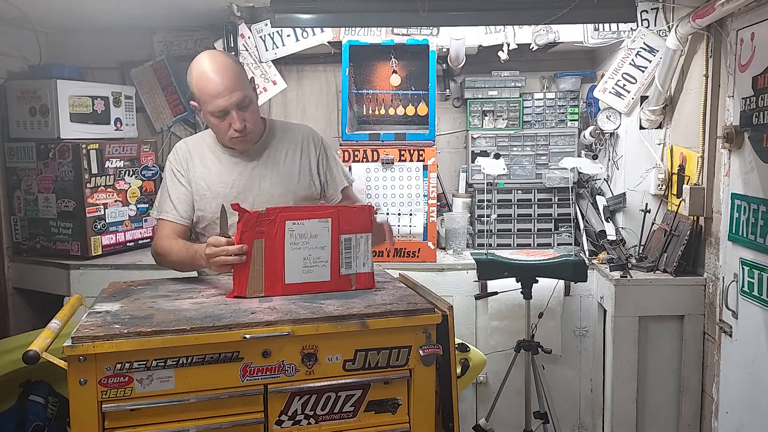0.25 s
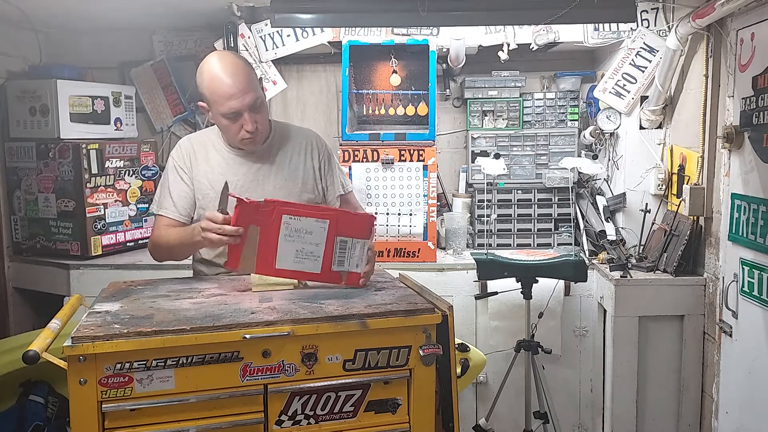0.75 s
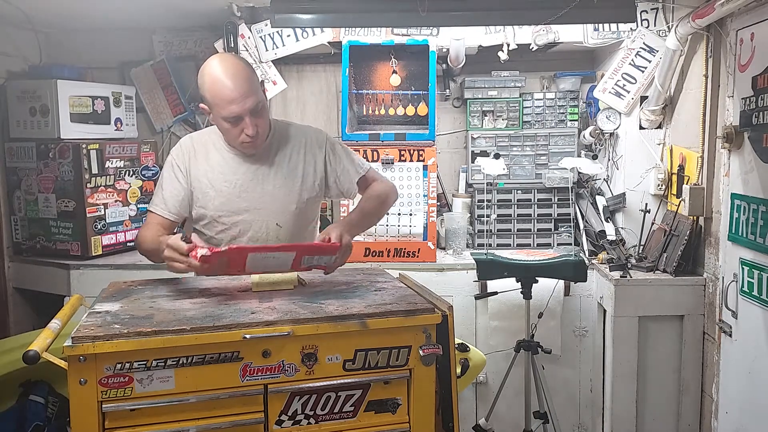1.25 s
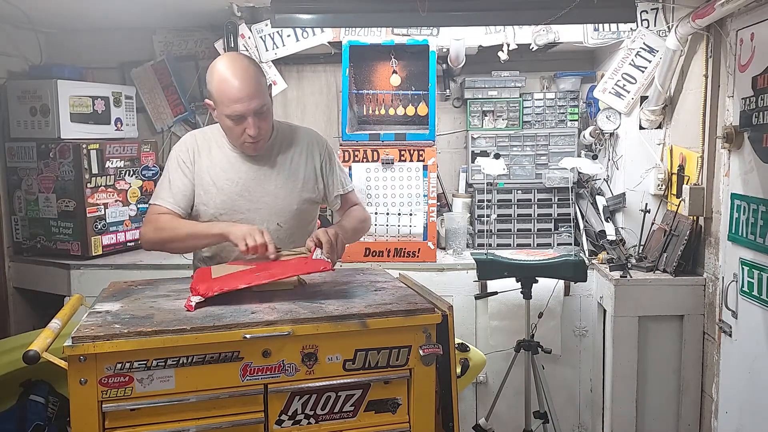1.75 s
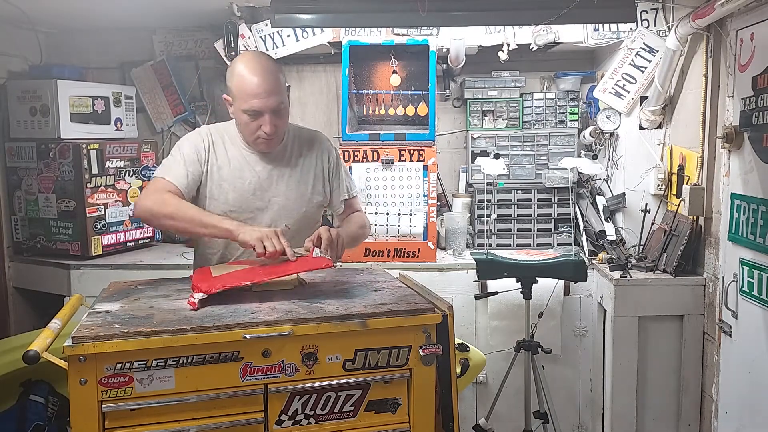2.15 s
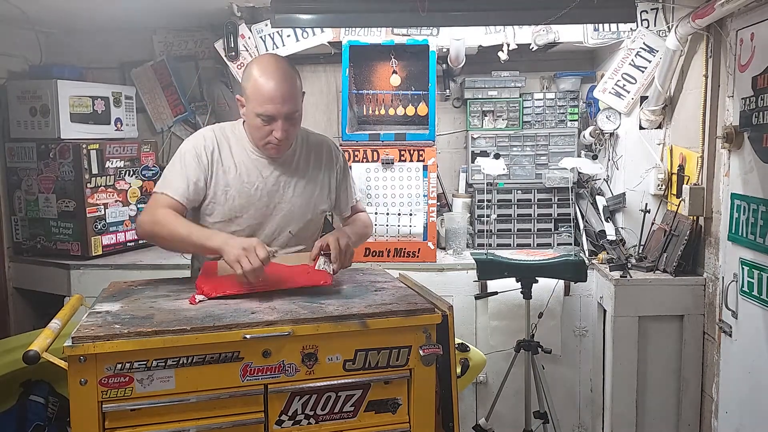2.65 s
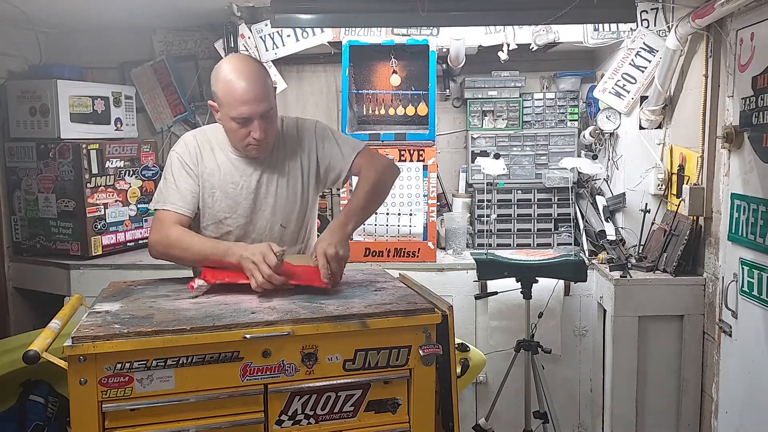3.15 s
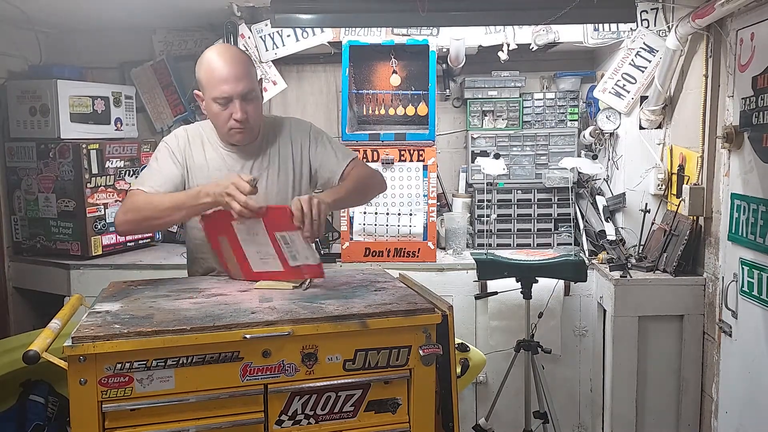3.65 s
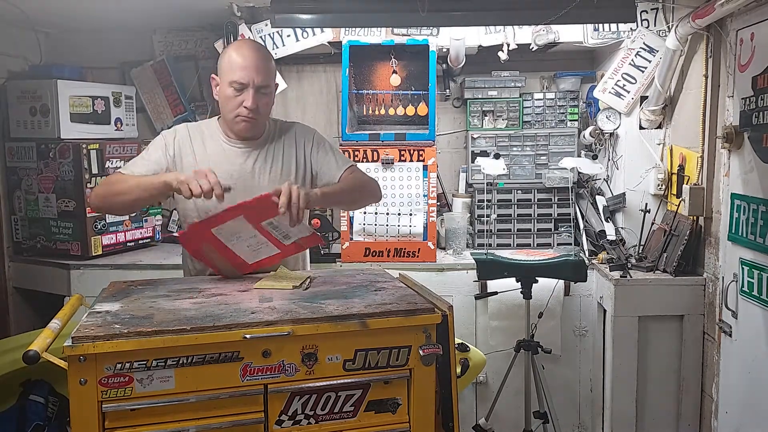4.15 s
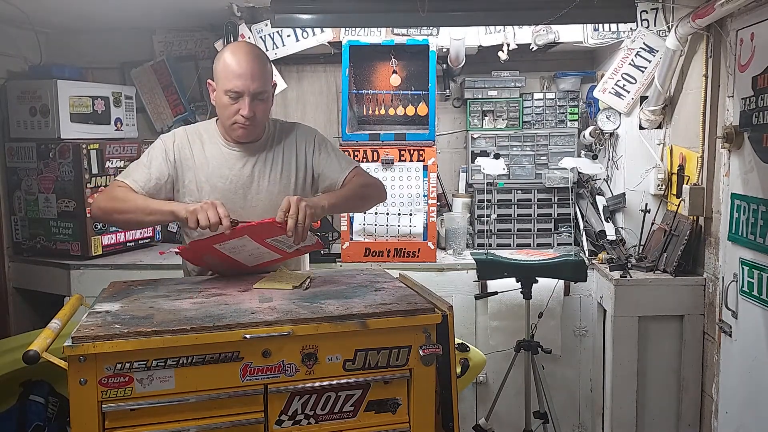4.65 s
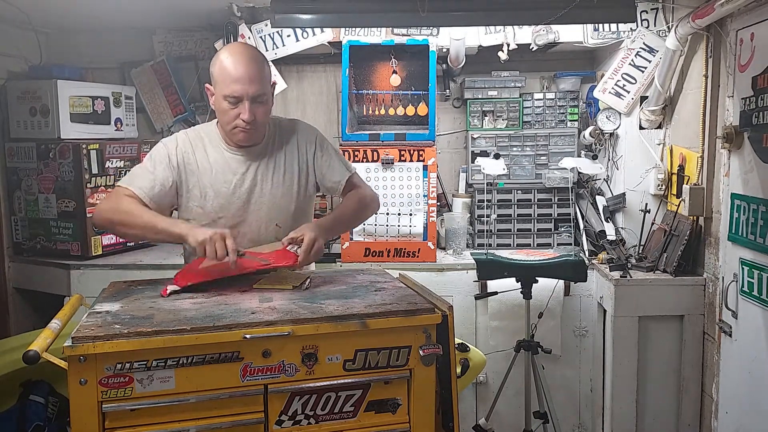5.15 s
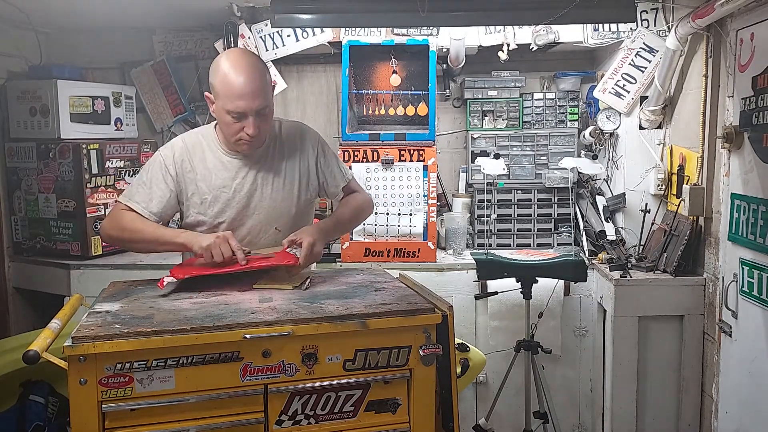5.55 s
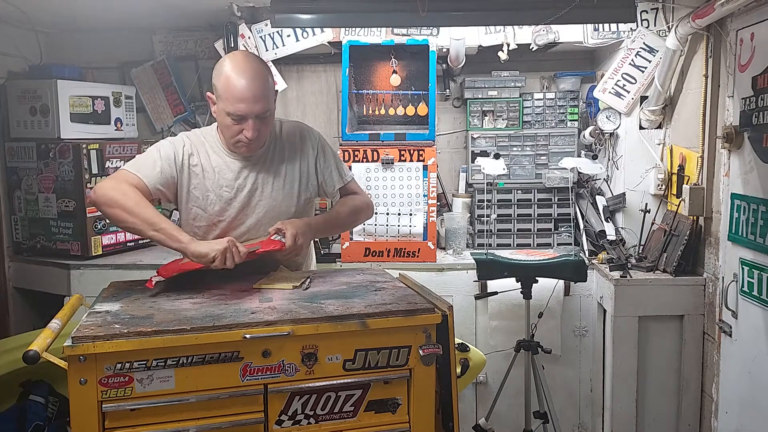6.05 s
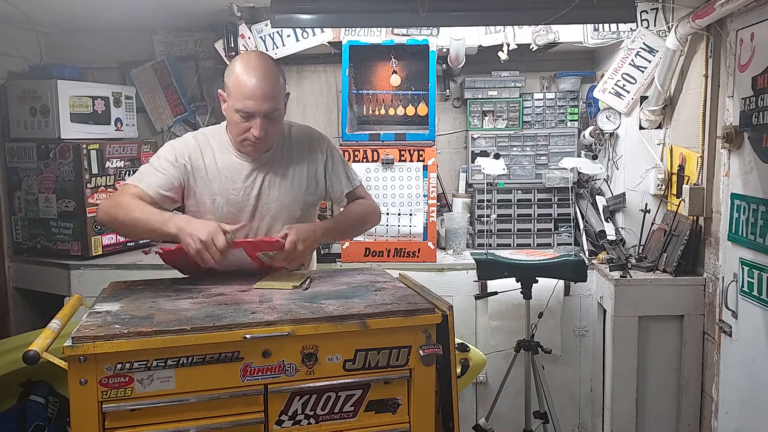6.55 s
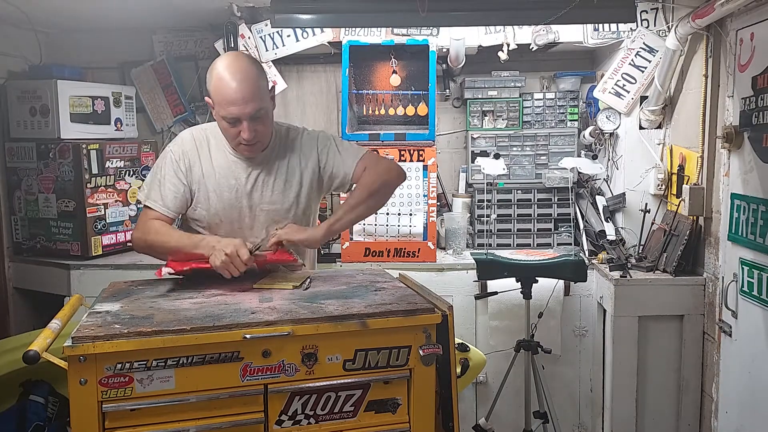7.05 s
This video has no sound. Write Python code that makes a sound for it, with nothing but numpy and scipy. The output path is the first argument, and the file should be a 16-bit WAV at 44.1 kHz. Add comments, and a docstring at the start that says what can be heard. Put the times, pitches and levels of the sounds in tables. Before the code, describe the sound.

A padded paper mailer is rubbed, turned and picked at on a steel tool chest, with crinkles, thuds and two sharp bursts of ripping.

```python
"""A padded paper mailer is turned over, picked at and ripped with a knife on a steel tool chest in a small garage.
From the start hands slide and shift over a faint background: dense tiny slips rustle the sheet, hiss and flex it.
Knocks and puffs on the chest begin at once too; soon a finger rasps and skims on tape, and scuffs and squeaks follow.
Creases snap from about 0.9 s, and the knife rips in jerks of breaking fibres near 2.3 s and again near 6.3 s.
The cluttered room answers each sound briefly, and a phone two metres away hears it through two ports."""
import sys
import numpy as np
from scipy import signal
from scipy.fft import rfft, irfft, next_fast_len
from scipy.io import wavfile
from scipy.ndimage import uniform_filter1d

SR = 44100
rng = np.random.default_rng(int(sys.argv[2]) if len(sys.argv) > 2 else 0)


def wrap_up_sound(samples):
    """Save the sound to the file named by the first command line argument, as 16-bit audio."""
    columns = np.atleast_2d(samples).T
    # keep every value between -1 and 1, then stretch to whole-number steps
    tamed = np.clip(columns, -1, 1)
    steps = np.round(tamed * 32767).astype(np.int16)
    wavfile.write(sys.argv[1], SR, steps)


N = 321930
T = np.arange(N) / SR  # time through the scene, s
TAIL = T[:SR // 2]  # half a second for short sounds and responses, s


def undb(db):
    """Turn decibels into gain."""
    return 10 ** (np.asarray(db) / 20)


def unit(x):
    """Scale to an energy of one."""
    return x / np.sqrt(np.sum(x ** 2, axis=-1, keepdims=True))


def gains(points, size):
    """Gain at each FFT bin, drawn between (pitch_hz, level_db) points on a log pitch scale."""
    hz, db = np.transpose(points)
    bins_hz = np.fft.rfftfreq(size, 1 / SR)
    return undb(np.interp(np.log(bins_hz + 1), np.log(hz), db))  # + 1 avoids log(0)


def colour(points):
    """Response with the given spectrum that starts at once and never sounds before its cause."""
    size = len(TAIL)
    cepstrum = irfft(np.log(gains(points, size)), size)
    # folding the cepstrum forward gives minimum phase
    cepstrum[1:size // 2] *= 2
    cepstrum[size // 2 + 1:] = 0
    return unit(irfft(np.exp(rfft(cepstrum)), size))


def ring(modes):
    """Response of resonances that each ring at one pitch and die away by 60 dB in their decay time."""
    total = np.zeros(len(TAIL))
    for k, (hz, db, decay_s) in enumerate(modes):
        fade = np.exp(-np.log(1000) * TAIL / decay_s)
        total += (-1) ** k * undb(db) * fade * np.sin(2 * np.pi * hz * TAIL)
    return unit(total)


def through(x, response):
    """Play a signal through one response, or one for each channel."""
    return signal.oaconvolve(np.atleast_2d(x), np.atleast_2d(response), axes=1)[:, :N]


def add(track, s, sound):
    """Mix a short sound into a track at time s."""
    start = max(int(s * SR), 0)
    part = sound[..., :N - start]
    track[..., start:start + part.shape[-1]] += part


def slips(rate, spread_db, smooth_db):
    """Rubbing surfaces stick and slip: uneven clicks, rate per second, over smooth noise; rms one."""
    size = undb(spread_db * np.minimum(rng.exponential(size=N), 5))
    clicks = (rng.random(N) < rate / SR) * size * rng.choice([-1, 1], N)
    x = clicks / clicks.std() + undb(smooth_db) * rng.standard_normal(N)
    return x / x.std()


def waver(rate):
    """Random levels held for 1 / rate seconds, then smoothed twice; spread near one."""
    k = int(SR / rate)
    steps = np.repeat(rng.standard_normal(N // k + 1), k)
    return 1.3 * uniform_filter1d(uniform_filter1d(steps, k), k)[:N]


def gesture_power(rows, attack_s, release_s):
    """Power in each layer of gestures (start_s, length_s, layer levels in dB): contact builds, holds, dies away."""
    power = np.zeros((len(rows[0]) - 2, N))
    rise = np.sin(np.pi / 2 * np.minimum(TAIL / attack_s, 1)) ** 2
    for start, length, *db in rows:
        shape = rise * np.exp(-np.maximum(TAIL - length, 0) / release_s)
        add(power, start, np.outer(undb(db), shape) ** 2)
    return power


# spectrum of the quiet garage: pitch_hz, level_db
GARAGE_SPECTRUM = [(25, -24.5), (45, -5), (90, 1.5), (160, -8), (250, -2), (350, -1.5), (600, -16),
                   (1400, -33), (3500, -41), (6200, -15), (8500, -26), (11000, -19.5), (16000, -15.5)]


def garage_background():
    """Faint rumble and hiss fill the pauses: noise shared by both sides plus stronger separate noise on each."""
    shared = rng.standard_normal(N)
    separate = undb(5.5) * rng.standard_normal((2, N))
    return undb(-76.5) * through(shared + separate, colour(GARAGE_SPECTRUM))


# how hard the hands work the mailer between gestures: time_s, level_db
HANDLING_LEVEL = [(0.0, -59), (0.45, -63), (0.65, -64.5), (1.4, -65.5), (1.67, -60), (2.34, -68.5),
                  (2.7, -62.5), (2.84, -61.5), (3.19, -56.5), (3.6, -68), (3.78, -58.5), (4.35, -65.5),
                  (5.29, -64.5), (5.47, -76), (6.28, -57.5), (6.42, -57.5), (6.95, -57.5), (7.3, -59)]
# share of that work in each layer: rustle_db, hiss_db, fine_treble_db, flexing_db
HANDLING_SHARE = [-3, -6.5, -6.5, -7.5]
# the hands come to rest: middle_s, half_length_s, drop_db
HAND_RESTS = [(1.737, 0.13, 23), (1.913, 0.034, 13), (2.123, .07, 10.5), (2.585, 0.055, 23.5),
              (2.878, .035, 7), (4.07, 0.03, 4), (4.434, .03, 12.5), (5.557, 0.024, 6), (5.817, 0.017, 7),
              (6.173, 0.029, 5.5)]


def handling():
    """Power in each layer from hands that keep shifting their hold, with a smooth dip at each rest."""
    db = np.interp(T, *np.transpose(HANDLING_LEVEL))
    for s, half, drop_db in HAND_RESTS:
        db = db - drop_db * np.exp(-((T - s) / half) ** 2)
    return np.outer(undb(HANDLING_SHARE), undb(db)) ** 2


STROKE_ATTACK_S = 0.027
STROKE_RELEASE_S = 0.021
# a hand or the blade slides over the mailer: start_s, length_s, rustle_db, hiss_db, flexing_db
SLIDING_STROKES = [ (0, 0.053, -62, -69, -65), (0.13, 0.17, -63.5, -91, -63),
                   (0.374, 0.095, -58.5, -62.5, -55.5), (0.461, 0.067, -50.5, -65, -48),
                   (0.796, 0.078, -56.5, -68, -88), (1.037, 0.32, -91, -68, -92),
                   (1.327, 0.02, -53, -42.5, -67), (1.958, 0.064, -58.5, -64, -52.5),
                   (2.433, 0.051, -57.5, -57.5, -75), (2.73, 0.064, -69, -78, -59),
                   (3.02, 0.061, -64, -62.5, -54), (3.1, .12, -57.5, -60.5, -60),
                   (3.23, 0.1, -56.5, -58, -65.5), (3.495, 0.12, -92, -59.5, -88),
                   (3.592, 0.095, -51.5, -57.5, -57), (3.72, 0.085, -50.5, -57.5, -49.5),
                   (3.819, 0.062, -52.5, -85, -52.5), (3.886, 0.03, -53, -50.5, -51.5),
                   (3.96, 0.063, -56, -65, -58), (4.138, 0.057, -51.5, -62, -54.5),
                   (4.177, 0.061, -50, -66.5, -49), (4.738, 0.11, -83, -95, -66.5),
                   (4.986, 0.16, -52.5, -55, -56), (5.276, .13, -60, -64.5, -65.5),
                   (5.633, 0.045, -56, -68, -63.5), (5.657, 0.058, -58.5, -63, -62),
                   (5.932, 0.11, -70.5, -64.5, -75), (6.226, 0.034, -54, -58.5, -48.5),
                   (6.54, 0.043, -58.5, -47.5, -78), (6.606, 0.13, -55.5, -64, -84),
                   (6.717, 0.046, -44.5, -45.5, -43.5), (6.936, 0.14, -54.5, -63.5, -49),
                   (7.137, 0.078, -50, -52, -47), (7.237, 0.069, -53.5, -56, -53.5)]


def stroking():
    """Power in each layer of a slide; its fine treble follows the hiss, 1 dB above."""
    rows = [(s, length, rustle, hiss, hiss + 1, flex) for s, length, rustle, hiss, flex in SLIDING_STROKES]
    return gesture_power(rows, STROKE_ATTACK_S, STROKE_RELEASE_S)


def rubbing(grip_db=1.0):
    """Friction drives four layers (rustle, hiss, fine treble, flexing) in handling, strokes, scuffs and skims."""
    power = handling() + stroking() + scuffing()
    power[2] += skimming()  # only the fine treble
    # coarse slips move the whole sheet, finer ones only its fibres
    coarse = slips(rate=1000, spread_db=4.0, smooth_db=-9.0)
    fibres = slips(rate=800, spread_db=3.0, smooth_db=-8)
    # the fingers grip and let go unevenly
    grip = undb(grip_db * waver(rate=40))
    return np.sqrt(power) * [coarse * grip, fibres * grip, fibres * grip, rng.standard_normal(N)]


# spectrum of the rustling sheet: pitch_hz, level_db
SHEET_SPECTRUM = [(200, -30.5), (380, 1.5), (550, -2), (800, 9.5), (1100, 4.5), (1450, -1.5), (1800, 3),
                  (2400, 0), (2900, -11), (5000, -11), (12000, -76.5)]
# broad resonances of the stiff sheet: pitch_hz, relative level_db, decay_s (to fall 60 dB)
SHEET_RESONANCES = [(566.7, 9, 0.11), (682, 10.5, 0.11), (790, 6.5, 0.02), (799, -9.5, 0.024),
                    (972, -2.5, 0.027), (1250, 11.5, 0.1), (1603, -14, 0.037), (2080, -12, 0.013),
                    (2290, 0, 0.081)]


def sheet_sound(force):
    """The stiff sheet turns slips and snaps into a rustle with a touch of ringing."""
    return through(force, unit(colour(SHEET_SPECTRUM) + undb(-10.0) * ring(SHEET_RESONANCES)))


# spectrum of the finest fibres, the top treble: pitch_hz, level_db
FINE_SPECTRUM = [(4000, -37), (8600, -8.5), (10800, 4.5), (12500, 0.5), (14500, 2.5), (16000, -12.5)]


def fine_sound(force):
    """The finest fibres answer only in the top treble."""
    return through(force, colour(FINE_SPECTRUM))


# spectrum of the hissing surface: pitch_hz, level_db
HISS_SPECTRUM = [(800, -25.5), (2200, 0), (3000, 0.5), (3900, 2.5), (5200, 2), (7000, 2.5), (8600, -14.5),
                 (11000, -13), (16000, -30)]


def hiss_sound(force):
    """Small slips on the paper's surface make a hiss."""
    return through(force, colour(HISS_SPECTRUM))


# mailer and hands land on the chest: start_s, knock_db, hardness_hz (higher sounds brighter), puff_db
CHEST_KNOCKS = [ (.002, -49.5, 377, -48.5), (0.034, -51, 413, -52), (.07, -51.5, 400, -64),
                (.463, -52, 500, -45), (.485, -42.5, 400, -41.5), (0.512, -41, 600, -49),
                (.602, -42.5, 724, -56), (1.42, -38.5, 510, -39), (1.443, -32.5, 344, -37.5),
                (1.584, -50, 400, -55.5), (1.813, -50, 694, -63), (2.011, -43, 397, -57),
                (2.295, -37, 900, -42), (2.338, -25.5, 900, -43), (2.358, -25, 614, -39),
                (2.691, -65, 830, -44), (3.665, -38.5, 454, -46), (3.903, -38.5, 506, -52),
                (4.285, -44.5, 600, -49.5), (5.613, -65, 1205, -77.5), (6.312, -22.5, 534, -33),
                (6.336, -30.5, 350, -39.5), (6.368, -30, 450, -33.5), (6.724, -42.5, 900, -52),
                (6.944, -41.5, 400, -52), (7.004, -37, 450, -47.5), (7.159, -35.5, 645, -53)]


def knocking(size_db=29, puff_hz=300):
    """Each landing is one smooth push on the chest and one on the padding; softer contact sounds duller."""
    force = np.zeros((2, N))
    t = TAIL[:SR // 50]
    for s, db, hard_hz, puff_db in CHEST_KNOCKS:
        push = t * np.exp(-2 * np.pi * np.outer([hard_hz, puff_hz], t))
        push = push / push.sum(axis=1, keepdims=True)
        add(force, s, undb(size_db) * undb([[db], [puff_db]]) * push)
    return force


# the mailer lying on the hollow chest: pitch_hz, relative level_db, decay_s (to fall 60 dB)
CHEST_RESONANCES = [(105, -9, 0.077), (202.5, -15, 0.2), (244.7, -1, 0.15), (295.7, 1.5, 0.11),
                    (374.2, -6, 0.14), (413, -3, .13), (461, -9, 0.099), (548.3, -7, 0.11),
                    (653, -12.5, 0.23), (787, -9, 0.16), (857.5, -11, 0.1), (940, -46.5, 0.25)]
# air cushion of the padded mailer: pitch_hz, relative level_db, decay_s (to fall 60 dB)
PADDING_RESONANCES = [(65.5, -7.5, 0.21), (116.6, 7, 0.11), (149.5, 0, 0.19), (188, -14, 0.11)]


def body_sound(flex, knock, puff):
    """Flexing and knocks ring the hollow chest; puffs and a little flexing push the air cushion."""
    chest = through(flex + knock, ring(CHEST_RESONANCES))
    padding = through(puff + undb(-13.5) * flex, ring(PADDING_RESONANCES))
    return chest + padding


# a finger drags on the tape with a dry, high rasp: start_s, length_s, level_db
TAPE_RASPS = [(.29, 0.031, -57), (1.335, 0.02, -55), (3.31, .04, -57), (4.28, 0.022, -54.5),
              (4.47, 0.021, -60), (5.3, 0.012, -47.5)]
# spectrum of that rasp: pitch_hz, level_db
RASP_SPECTRUM = [(1500, -49), (3000, -9), (3800, 0), (4600, -11), (8000, -38)]


def rasping():
    """Fast slips on taut tape sound in one narrow band."""
    power = gesture_power(TAPE_RASPS, STROKE_ATTACK_S, release_s=0.011)[0]
    force = np.sqrt(power) * slips(rate=2700, spread_db=0.5, smooth_db=-6)
    return through(force, colour(RASP_SPECTRUM))


# a fingertip skims over smooth tape: start_s, length_s, level_db
TAPE_SKIMS = [(.39, 0.13, -58), (1.11, 0.085, -65), (1.82, 0.19, -66.5), (2.22, 0.016, -56),
              (2.72, 0.28, -66.5), (2.92, 0.036, -59.5), (3.04, 0.097, -66)]


def skimming():
    """Power of light skims, which build and fade like strokes."""
    return gesture_power(TAPE_SKIMS, STROKE_ATTACK_S, STROKE_RELEASE_S)[0]


# the mailer catches on the chest or a finger and scuffs to a stop: start_s, rustle_db, flexing_db
SHORT_SCUFFS = [(0.602, -55.5, -52), (1.42, -45.5, -42), (1.813, -57.5, -44.5), (2.684, -44, -43.5),
                (3.398, -49, -43), (4.284, -59, -39), (4.508, -51.5, -58), (4.572, -79, -52.5),
                (5.609, -60.5, -62)]


def scuffing(attack_s=0.0024, release_s=0.021):
    """Power in each layer of a sudden catch; hiss and fine treble stay well below the rustle."""
    rows = [(s, attack_s, rustle, rustle - 15.5, rustle - 10.5, flex) for s, rustle, flex in SHORT_SCUFFS]
    return gesture_power(rows, attack_s, release_s)


# an edge catches and the sheet squeaks or judders: middle_s, pitch_hz, level_db, half_length_s
SHEET_SQUEAKS = [(0.62, 413, -46, 0.0031), (2.302, 970, -36, 0.006), (2.35, 1270, -22.5, 0.0027),
                 (3.798, 820, -36, 0.0024), (4.517, 848, -48, 0.0088), (5.665, 743, -43.5, 0.0018),
                 (6.728, 670, -31.5, 0.0019), (7.163, 393, -33, 0.0074)]


def squeaking():
    """For a few cycles the slips lock on to one resonance of the sheet: a short swelling and fading tone."""
    out = np.zeros(N)
    for s, hz, db, half in SHEET_SQUEAKS:
        t = np.arange(-np.pi * half, np.pi * half, 1 / SR)
        swell = np.exp(-(t / half) ** 2)
        add(out, s + t[0], np.sqrt(2) * undb(db) * swell * np.sin(2 * np.pi * hz * t))
    return out


# creases and tape snap: start_s, then relative levels sheet_db, crack_db, fine_treble_db
CREASE_SNAPS = [ (0.919, -54.5, -51, -60), (1.054, -62, -59, -62), (1.105, -58, -59.5, -61),
                (1.228, -59, -66, -57), (1.326, -62, -45, -44.5), (1.592, -56.5, -55, -56.5),
                (1.998, -64, -66, -52), (2.352, -27, -30, -41), (3.12, -52, -54, -51.5),
                (3.149, -59, -53, -51), (3.212, -51, -58, -55), (3.254, -49, -41.5, -38.5),
                (3.393, -41, -64, -59), (3.596, -40, -28.5, -34), (3.744, -70, -55, -47),
                (3.761, -49.5, -49, -56), (3.792, -39, -46, -62), (3.907, -43.5, -44.5, -43),
                (4.285, -46, -60.5, -76), (4.467, -53.5, -44, -49.5), (4.576, -60, -72, -54),
                (4.658, -57.5, -60.5, -60), (4.974, -51, -44.5, -46), (5.404, -52.5, -63.5, -60),
                (6.31, -32, -39, -40.5), (6.403, -46, -42.5, -49), (6.433, -38, -53, -49.5),
                (6.473, -58, -44.5, -49), (6.931, -48, -55.5, -61), (7.158, -41, -53, -52)]


def snapping(fall_s=0.00098, size_db=27, settle_s=0.0057, settle_db=-14):
    """A crease gives way within a millisecond or so, then settles with a few smaller ticks."""
    force = np.zeros((3, N))
    t = TAIL[:SR // 30]
    for s, *db in CREASE_SNAPS:
        snap = rng.standard_normal((3, len(t))) * np.exp(-t / fall_s)
        ticks = rng.standard_normal(len(t)) ** 3  # cubing leaves a few strong ticks
        settling = undb(settle_db) * ticks / ticks.std() * np.exp(-t / settle_s)
        add(force, s, undb(size_db) * undb(db)[:, None] * unit(snap + settling))
    return force


# spectrum of cracking creases: pitch_hz, level_db
CRACK_SPECTRUM = [(1200, -28), (2400, -4), (3000, -5.5), (3800, 4), (4600, 1.5), (5400, 1), (7200, -0.5),
                  (8600, -19), (14000, -46)]


def crack_sound(force):
    """The sharp part of a snap is a bright crack."""
    return through(force, colour(CRACK_SPECTRUM))


# the knife jerks through tape and paper: start_s, length_s, rustle_db, hiss_db, flexing_db
KNIFE_RIPS = [(2.272, 0.0087, -34, -33, -45), (2.283, 0.04, -29, -31.5, -26),
              (2.312, 0.059, -33.5, -33, -34.5), (2.33, 0.017, -32, -22.5, -29),
              (2.377, 0.024, -43, -44, -37.5), (6.262, 0.023, -42, -47, -43.5),
              (6.278, 0.019, -39.5, -34.5, -34.5), (6.303, 0.0074, -24, -33, -54),
              (6.313, 0.077, -43, -51, -35.5), (6.42, 0.0084, -40.5, -44, -32),
              (6.466, .025, -49.5, -53, -44.5)]


def ripping():
    """Fibres break one after another as the knife jerks forward; they drive the same layers as rubbing."""
    # fine treble is 4 dB over the hiss
    rows = [(s, length, rustle, hiss, hiss + 4, flex) for s, length, rustle, hiss, flex in KNIFE_RIPS]
    power = gesture_power(rows, attack_s=0.0076, release_s=0.0057)
    coarse = slips(rate=1800, spread_db=6.5, smooth_db=-12.5)
    fibres = slips(rate=900, spread_db=8.0, smooth_db=-11)
    return np.sqrt(power) * [coarse, fibres, fibres, rng.standard_normal(N)]


def room(x, t60, wet_db, lag_s, build_s=0.00033, turn_hz=4.5):
    """Direct sound, a little later on the right, plus two dense sets of echoes that keep trading places."""
    decay = np.exp(-np.log(1000) * TAIL / t60) * (1 - np.exp(-TAIL / build_s))
    direct = np.zeros((2, SR // 100))
    direct[0, 0] = 1
    direct[1, int(abs(lag_s) * SR)] = 1
    # a steady turn stands in for the mailer flexing and turning
    angle = 2 * np.pi * turn_hz * T
    echoes = np.zeros((2, N))
    for facing in (np.cos(angle), np.sin(angle)):
        reflections = unit(rng.standard_normal((2, len(TAIL))) * decay)
        echoes += through(x * facing, reflections)
    return (through(x, direct) + undb(wet_db) * echoes) / np.sqrt(1 + undb(wet_db) ** 2)


def scene():
    """Sheet, surface, creases and body sound into the garage, over its quiet background."""
    rustle, hiss, fine_hiss, flex = rubbing() + ripping()
    knock, puff = knocking()
    pop, crack, fine_crack = snapping()
    sheet = sheet_sound(rustle + pop) + squeaking()
    surface = hiss_sound(hiss) + fine_sound(fine_hiss) + rasping()
    body = body_sound(flex, knock, puff)
    creases = crack_sound(crack) + fine_sound(fine_crack)
    mailer = (room(sheet, t60=0.14, wet_db=3.0, lag_s=0.00013)
              + room(surface, t60=0.12, wet_db=7.5, lag_s=0.00013)
              + room(body, t60=0.18, wet_db=-8.5, lag_s=0.0004)
              + room(creases, t60=0.19, wet_db=7.5, lag_s=0.00013))
    return mailer + garage_background()


# left minus right at the phone: pitch_hz, difference_db
PORT_BALANCE = [(60, -2), (150, -6.5), (380, -3.5), (700, -3), (1300, -1.5), (2400, -0.5), (5000, 2),
                (7000, -4), (8500, -1.5), (10200, -9.5), (12000, -11.5), (16000, 22)]


def record(dry):
    """The phone's two ports colour the sound differently; a steep filter cuts the top above 16150 Hz."""
    size = next_fast_len(N + SR // 10)
    lean = gains(PORT_BALANCE, size)
    # keep the mean power of the two ports at one
    ports = np.array([lean, np.ones_like(lean)]) / np.sqrt((1 + lean ** 2) / 2)
    heard = irfft(rfft(dry, size) * ports, size)[:, :N]
    top_cut = signal.ellip(10, 0.2, 70, 16150, fs=SR, output="sos")
    return signal.sosfilt(top_cut, heard)


dry = scene()
out = record(dry)
wrap_up_sound(out)
```